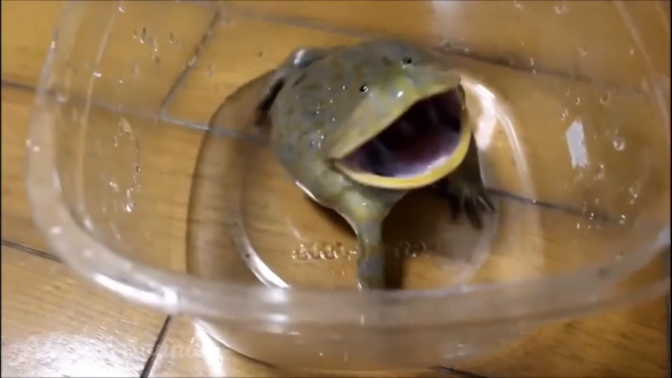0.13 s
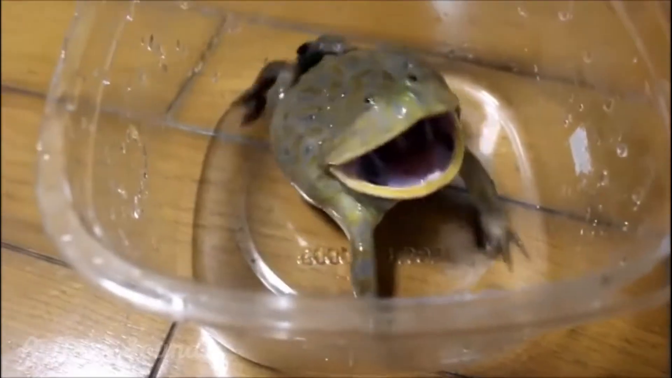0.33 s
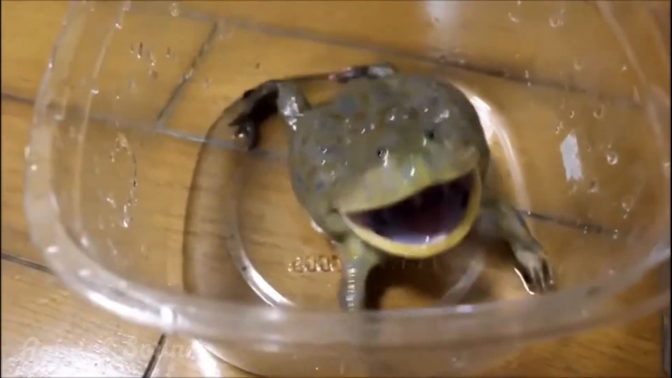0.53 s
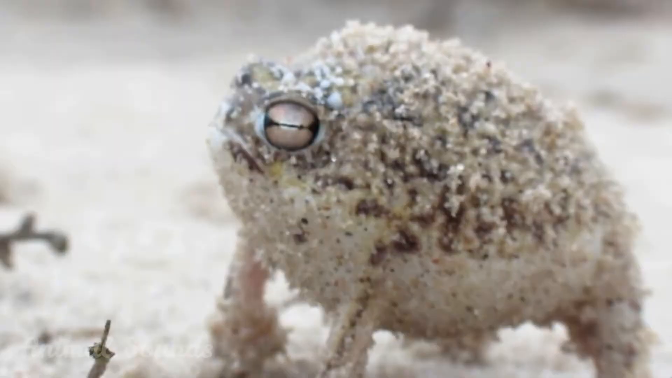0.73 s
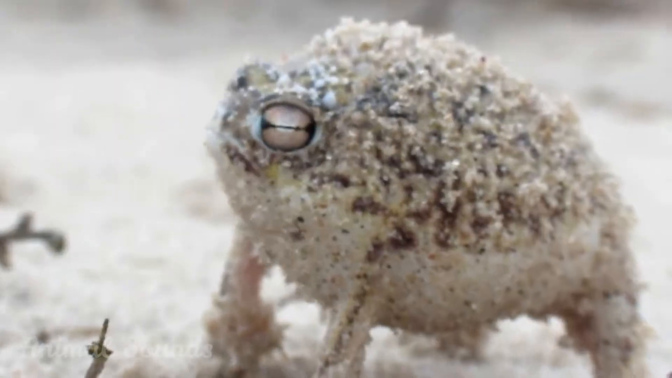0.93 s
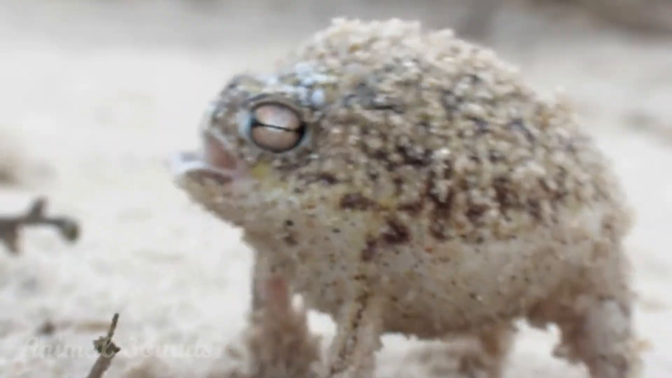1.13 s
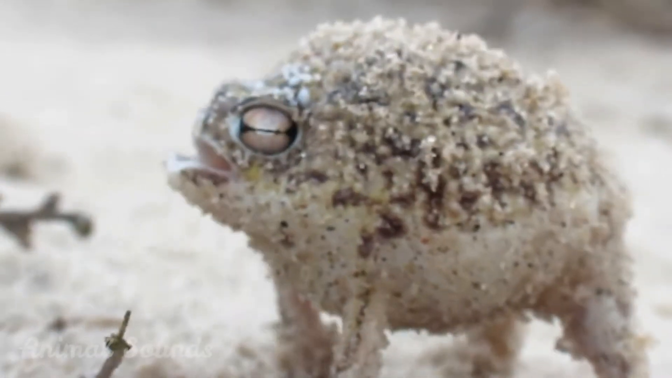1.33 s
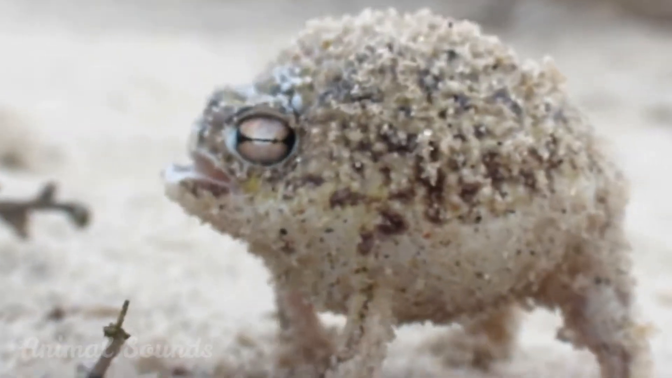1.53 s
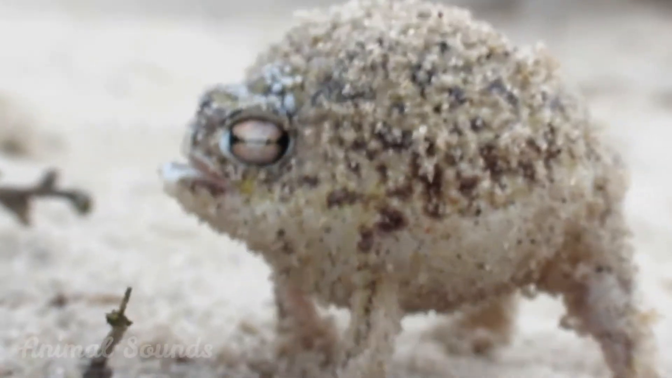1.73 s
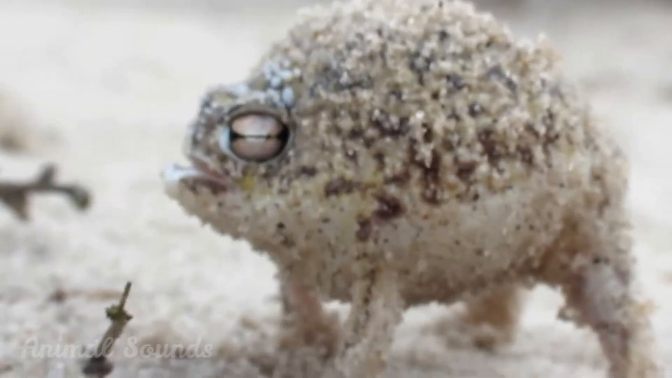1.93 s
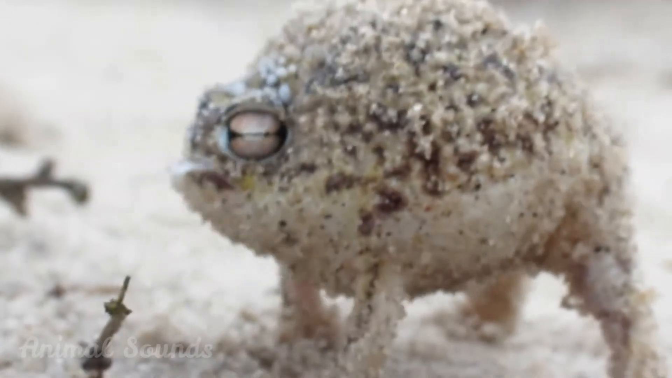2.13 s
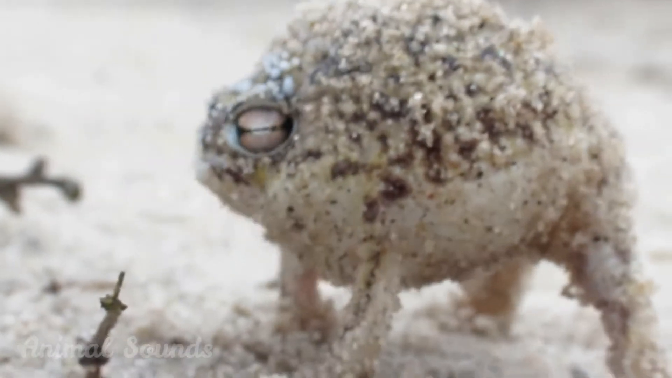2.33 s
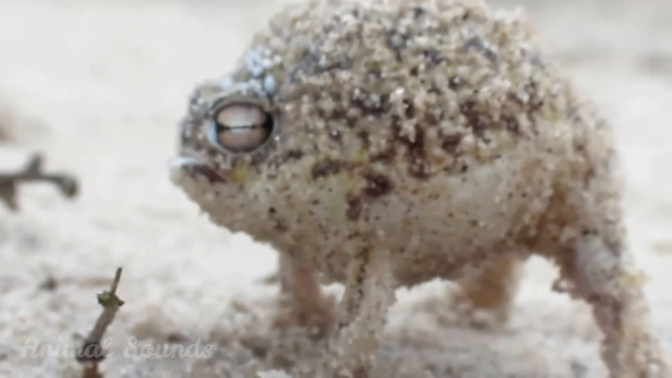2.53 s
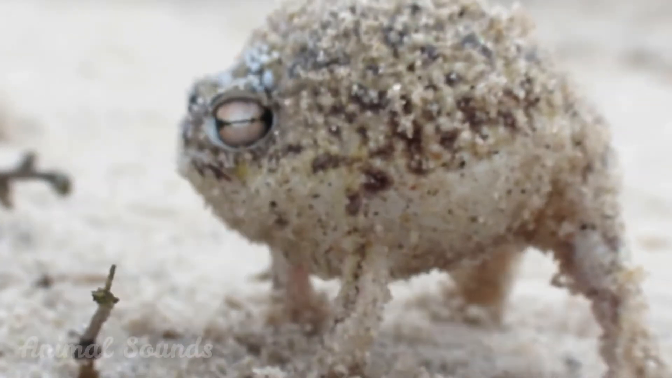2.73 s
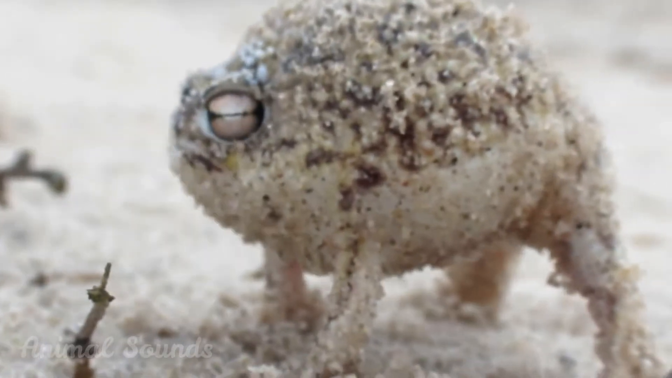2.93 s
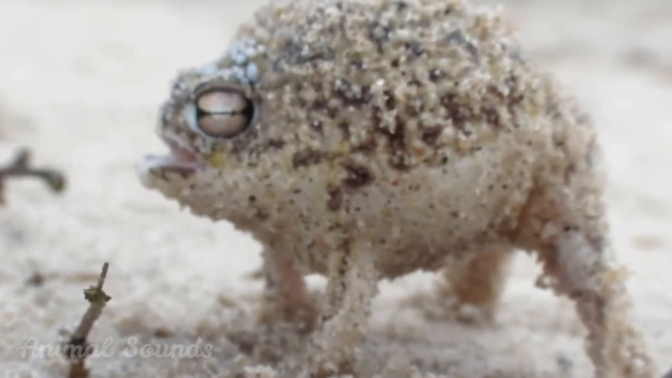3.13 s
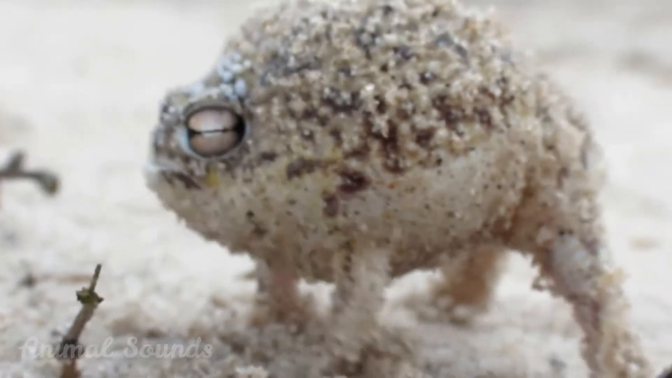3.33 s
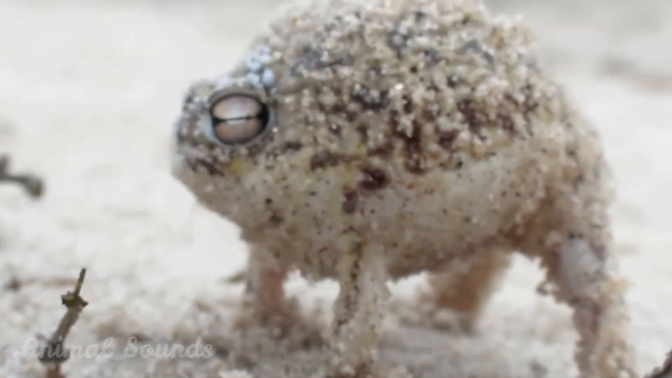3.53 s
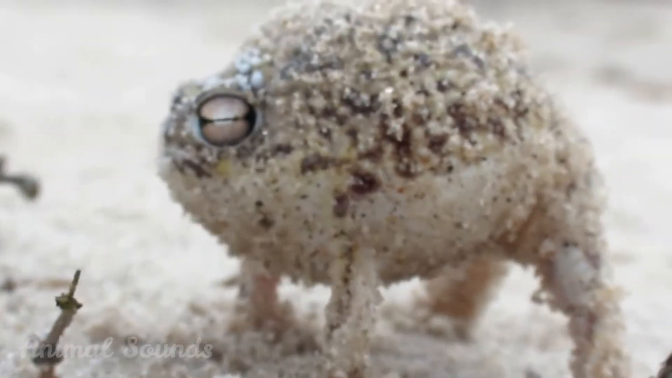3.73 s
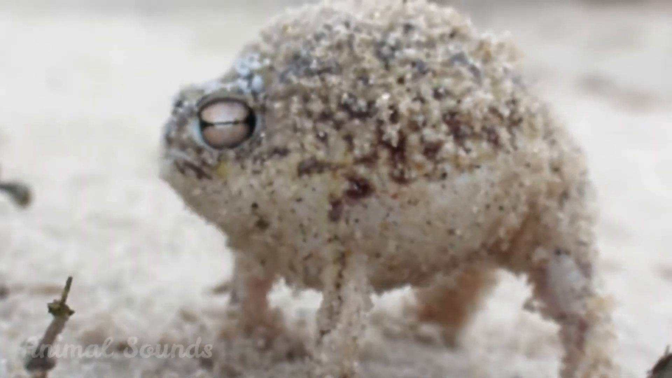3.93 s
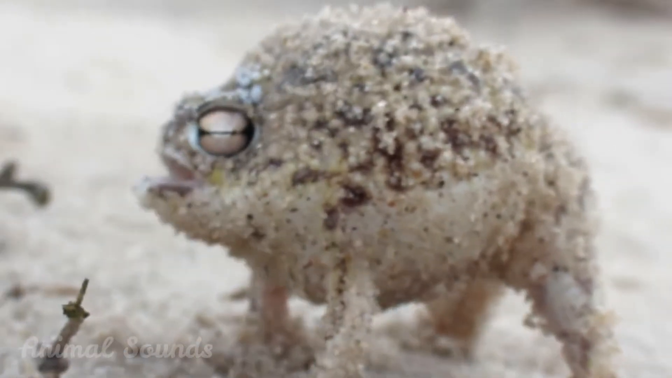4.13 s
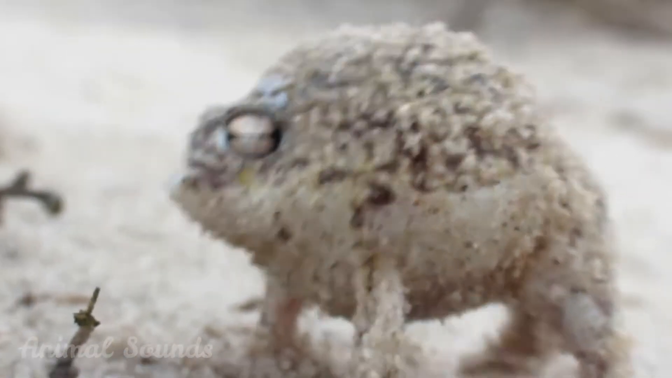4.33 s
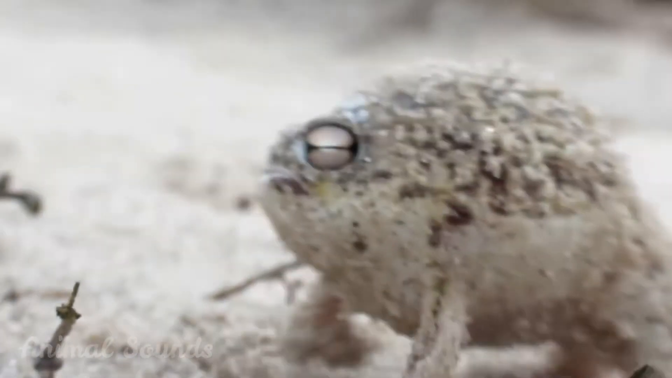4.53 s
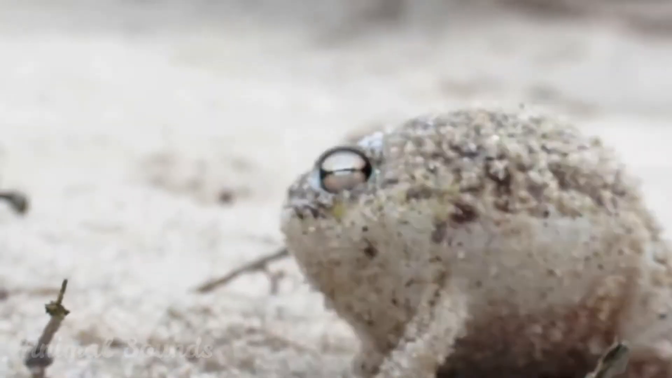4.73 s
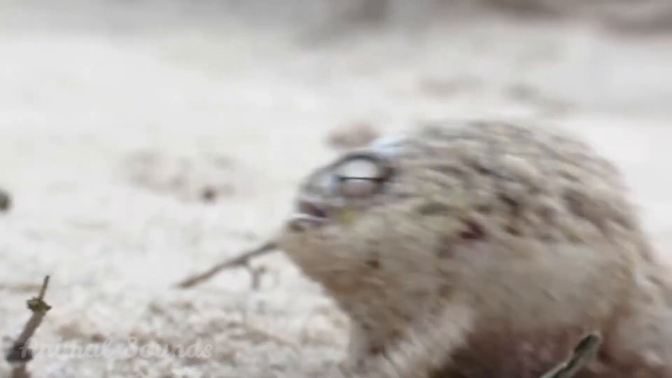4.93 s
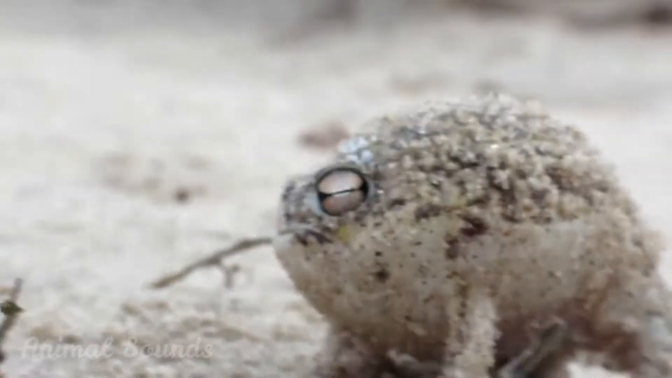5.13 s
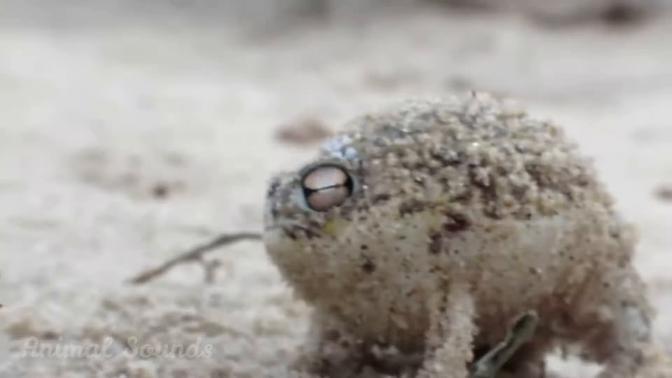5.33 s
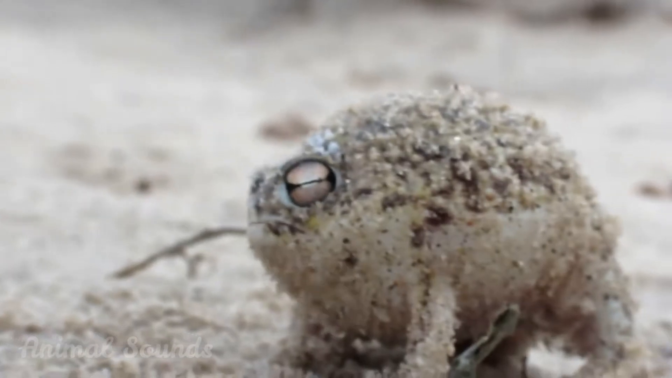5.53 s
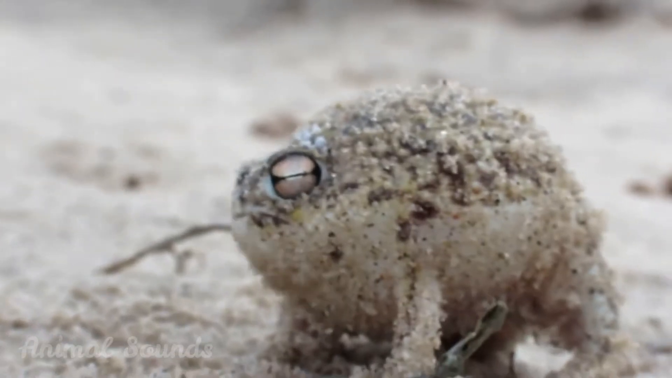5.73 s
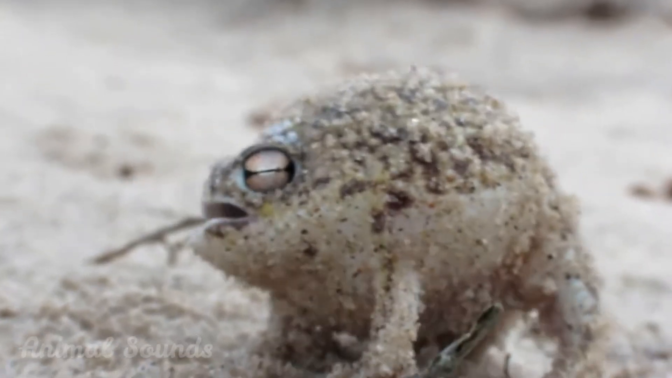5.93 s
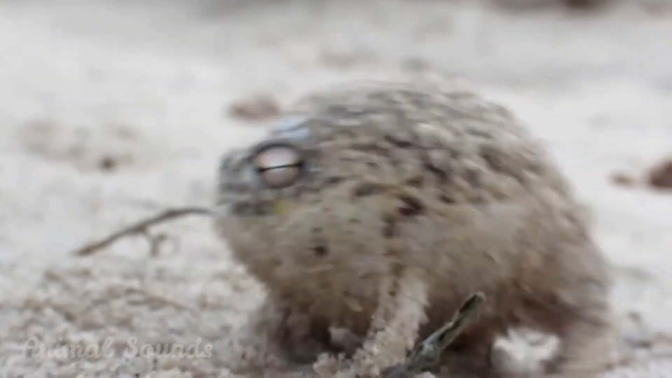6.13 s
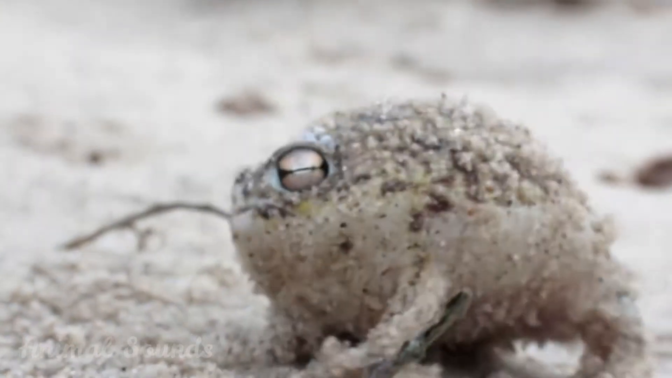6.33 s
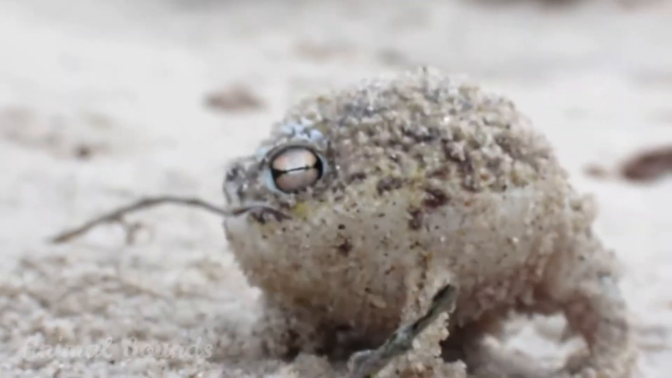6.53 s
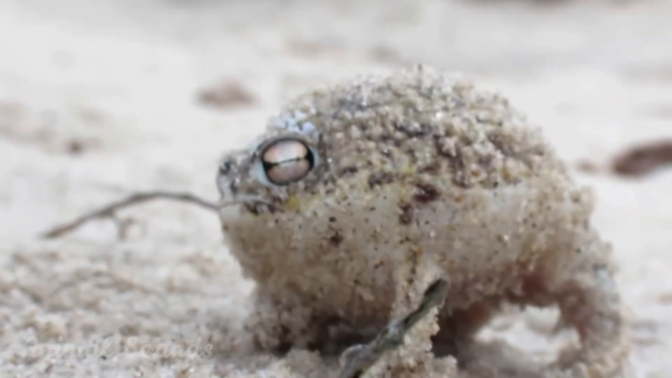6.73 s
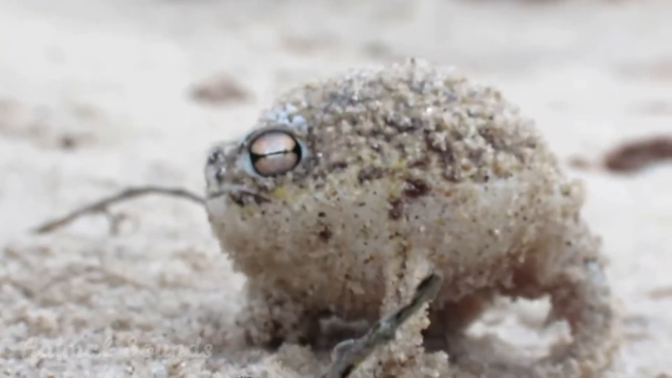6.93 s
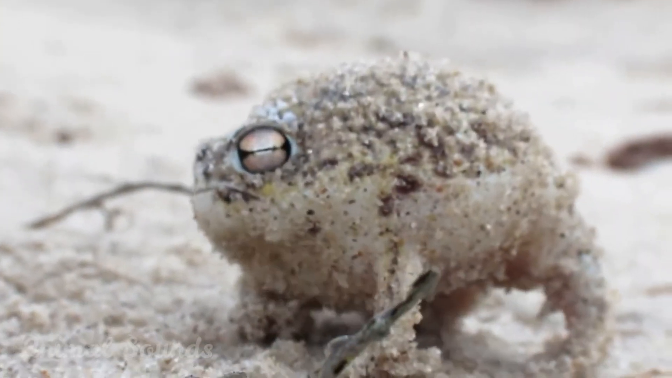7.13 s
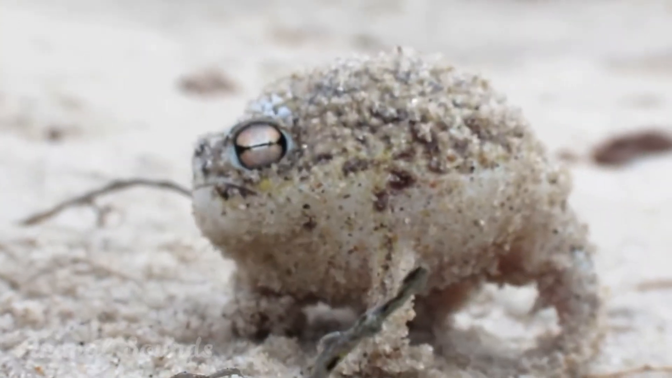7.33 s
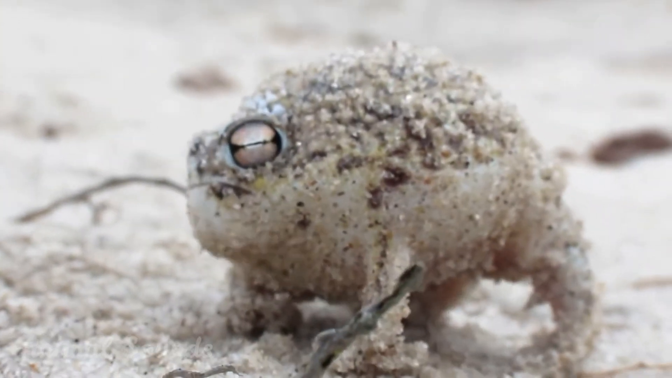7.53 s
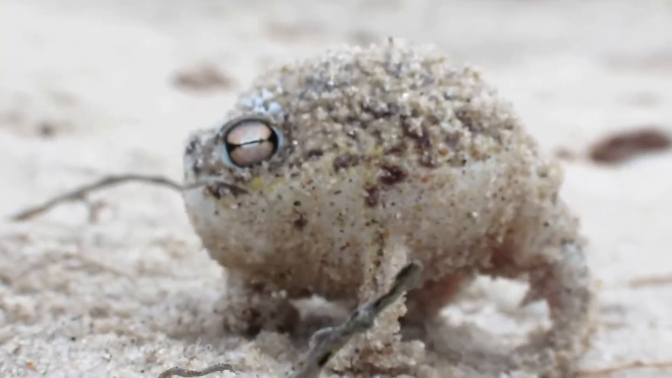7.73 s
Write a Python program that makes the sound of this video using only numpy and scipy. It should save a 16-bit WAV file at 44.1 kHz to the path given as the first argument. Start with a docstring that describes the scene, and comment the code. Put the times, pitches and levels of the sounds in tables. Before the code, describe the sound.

A small frog squeals seven times up close, high and reedy like a squeaky toy, over a faint low rumble.

```python
"""A frog shuffles briefly in a plastic tub, then silence. A soft low rumble, a hum and a faint hiss come in.
Close by, a small round rain frog squeals seven times: each squeal is a reed-like pulse train that
arches in pitch, rings in the mouth near 7 kHz and sags into a creak. Just before the fourth, a dull
bump hits the microphone. The last squeal is short and half-hearted, and one tiny tick of sand follows."""
import sys
import numpy as np
from scipy import signal
from scipy.fft import rfft, irfft
from scipy.io import wavfile
from scipy.ndimage import uniform_filter1d

SR = 44100
rng = np.random.default_rng(int(sys.argv[2]) if len(sys.argv) > 2 else 0)


def output_pcm(signal):
    """Save a mono or channel-first signal as 16-bit PCM at the path in sys.argv[1].

    Samples are clipped to [-1, 1] before scaling.
    """
    pcm = np.clip(np.atleast_2d(signal).T, -1, 1) * 32767
    wavfile.write(sys.argv[1], SR, np.round(pcm).astype(np.int16))


N = 343980
TIME = np.arange(N) / SR
FREQS = np.fft.rfftfreq(N, 1 / SR) + 1

# The squeals. Each row: start, end and scratchy onset in seconds, pitch overshoot as a share, widest
# mouth opening from 0 to 1, then opening, narrowing, nearly shut tail, fade and creak times in seconds,
# throat trim in dB, hoarseness in dB.
SQUEALS = [(1.172, 2.301, 0.011, 0.078, 1, 0.029, 0.69, 0.094, 0.056, 0.041, -2, -34),
           (2.495, 2.766, 0.011, 0.2, 1, 0.015, 0.033, 0.15, 0.035, 0.034, 0.5, -22.5),
           (3.068, 3.466, 0.0073, 0.51, 0.89, 0.058, 0.071, 0.096, 0.067, 0.015, -1.5, -34),
           (4.091, 4.713, .011, 0.54, 0.97, 0.026, 0.3, 0.15, 0.062, 0.048, 0, -36.5),
           (4.925, 5.243, .016, .5, 1, 0.056, 0.21, 0.071, 0.028, 0.0557, 1.5, -25),
           (5.886, 6.239, .015, .38, 0.91, 0.04, .13, .079, 0.044, 0.087, 1, -23),
           (6.538, 6.647, 0.044, 0.026, 0.3, 0.21, .02, 0.072, 0.017, 0.033, -2.5, -2.5)]
# Pitch arch of the vocal folds, one list a squeal. Each point: time in seconds, pitch in Hz.
PITCH_ARCHES = [
    [(1.195, 1374), (1.223, 1455), (1.247, 1540), (1.265, 1640), (1.385, 1522), (1.511, 1295),
     (1.573, 1207), (1.711, 1170), (1.787, 1018), (1.859, 1050), (2.113, 1064), (2.173, 938), (2.191, 888),
     (2.215, 798), (2.241, 630), (2.27, 590)],
    [(2.512, 1172), (2.578, 1285), (2.6, 1273), (2.62, 1137), (2.724, 882), (2.735, 933)],
    [(3.084, 864), (3.13, 1030), (3.168, 1141), (3.308, 1104), (3.378, 971), (3.43, 804)],
    [(4.112, 1017), (4.16, 1215), (4.232, 1253), (4.328, 1101), (4.43, 927), (4.494, 902.4), (4.55, 817),
     (4.61, 818), (4.656, 667), (4.672, 674), (4.68, 672)],
    [(4.947, 870), (4.991, 1007), (5.063, 1047), (5.099, 951), (5.129, 838), (5.169, 614), (5.185, 613),
     (5.207, 552), (5.215, 508.8)],
    [(5.907, 1004), (5.951, 1149), (5.987, 1203), (6.073, 1058), (6.121, 867), (6.155, 672), (6.171, 763),
     (6.177, 698.0), (6.191, 541.5), (6.21, 474)],
    [(6.548, 789), (6.61, 795), (6.642, 602)],
]
# Swells of the ringing mouth, one list a squeal. Each point: time in seconds, relative level in dB.
RING_SWELLS = [
    [(1.176, -18), (1.182, -9.5), (1.216, -8.5), (1.282, -16), (1.362, -11), (1.4, -6), (1.448, -18.5),
     (1.488, -16), (1.51, -15.5), (1.554, -10.5), (1.738, -14), (1.78, -17.5), (1.982, -9.5), (2.076, -9.5),
     (2.134, -15), (2.196, -15), (2.23, -29), (2.3, -60)],
    [(2.497, -28.5), (2.501, -14), (2.545, -13.5), (2.577, -7.5), (2.615, -15.5), (2.623, -21),
     (2.699, -25), (2.765, -57)],
    [(3.07, -30.5), (3.092, -11), (3.108, -8), (3.14, -15.5), (3.17, -11), (3.308, -12.5), (3.37, -16.5),
     (3.38, -39), (3.468, -63)],
    [(4.096, -24.5), (4.118, -5.5), (4.142, -16.5), (4.164, -8.5), (4.24, -9.5), (4.32, -17.5),
     (4.352, -13.5), (4.424, -16), (4.478, -11), (4.514, -11.5), (4.656, -33.5), (4.71, -45)],
    [(4.925, -28), (4.945, -18), (4.983, -12.5), (5.023, -7), (5.103, -18.5), (5.123, -10.5),
     (5.139, -18.5), (5.159, -16.5), (5.217, -35.5), (5.25, -50)],
    [(5.889, -29), (5.911, -8), (5.933, -12.5), (5.953, -6.5), (5.999, -8), (6.053, -16.5), (6.075, -11.5),
     (6.139, -14.5), (6.213, -36), (6.24, -66.5)],
    [(6.54, -34.5), (6.546, -34.5), (6.606, -31), (6.632, -44), (6.643, -53)],
]
# The voice with the mouth closed, ajar, narrow and wide.
# Each row: relative throat level in dB, relative edge level in dB, mouth resonance in Hz.
MOUTH_SHAPES = [(-36, -60, 1760), (-33, -47, 3850), (-33, -38.5, 6200), (-35.5, -28, 7580)]
# Tone of the throat, the mouth and the buzzing edge. Each row: frequency in Hz, relative level in dB.
THROAT_EQ = [(500, -26.5), (750, -14), (1100, -6.5), (1450, 3.5), (2100, 4), (2650, -1), (3350, 6.5),
             (3900, -2.5), (4400, -32), (5200, -12), (6500, -25.5)]
MOUTH_EQ = [(1000, -19.5), (2000, -9), (3400, -10.5), (4400, -17.5), (5200, -3), (6300, -7.5), (7400, -8.5),
            (9000, -8.5), (11000, -16)]
EDGE_EQ = [(7000, -26), (9600, 0), (10500, 3.5), (11500, -3), (12500, 0.5), (14400, 5), (15700, -1.5)]
# Stereo phase of the voice. Each row: frequency in Hz, lead of the left side in radians.
LEFT_LEAD = [(2150, 0), (3010, 1.0), (4740, -.8), (6030, .6), (7240, -.2), (8790, -.1), (9820, 1.1),
             (12300, 0), (14800, .7)]
# Stereo balance of the voice. Each row: frequency in Hz, left minus right in dB.
LEFT_LEAN = [(1300, 0), (2400, -1.5), (3300, 6), (4400, 4.5), (5400, -4.5), (6400, 4), (7400, 0.5),
             (8500, -4.5), (15000, -1.5)]
# Low hum in the tub. Each row: frequency in Hz, peak level in dB.
TUB_TONES = [(100, -39.5), (228, -45.5)]
# Ticks of sand. Each row: start in seconds, level in dB.
SAND_TICKS = [(0.855, -42), (5.37, -53), (7.52, -59.5)]
# Swells of the microphone bump. Each row: centre in seconds, half-length in seconds, level in dB.
BUMP_SWELLS = [(3.888, 0.023, -33.5), (3.934, 0.014, -21.5), (3.963, 0.026, -31), (4.311, .06, -36),
               (4.599, 0.18, -33.5)]
# Colours of the four noises. Each row: frequency in Hz, relative level in dB.
SHUFFLE_EQ = [(30, -7), (105, 0), (160, -8), (235, -14), (400, -16), (660, -11.5), (1100, -14),
              (1700, -22.5), (3100, -21), (3900, -34), (11000, -48.5)]
BUMP_EQ = [(25, 3), (50, 6), (100, 5), (170, -2), (280, -7.5), (500, -27), (1200, -62.5)]
RUMBLE_EQ = [(25, -8.5), (60, 0), (100, -3), (160, -3), (280, -4), (450, -11), (800, -17), (1400, -27.5),
             (3000, -41)]
HISS_EQ = [(530, -42.5), (900, -8), (1340, -2), (1830, -3.5), (2390, -9.5), (5410, -11.5), (13700, -21),
           (16000, -33)]
# Stereo width of the rumble. Each row: frequency in Hz, side minus mid in dB.
RUMBLE_SPREAD = [(50, 3), (180, -9.5), (550, -2.5), (1650, 1.5)]

AJAR, NARROW = 1 / 3, 2 / 3   # mouth openings between 0, closed, and 1, wide
AIR_START_S, CUTOFF_HZ = .749, 15900


def squeal(row, arch, swells, flutter_db=1.66, flutter_hz=25, ring_trim_db=-2.5, weak_edge_db=28):
    """Harmonics of the vocal folds sweep through a mouth resonance that sinks as the mouth closes."""
    start, end, catch_s, overshoot, widest, open_s, narrowing_s, tail_s = row[:8]
    fade_s, creak_s, throat_trim_db, hoarse_db = row[8:]
    size = int(np.ceil((end - start) * 10)) * SR // 10
    at = int(start * SR) + np.arange(size)
    t = at / SR
    # the folds catch high and unevenly at the start, follow a rounded arch and creak when they go slack
    catch = np.exp(-((t - start) / catch_s) ** 2)
    slack = np.clip((t - end + creak_s) / 0.001, 0, 1)
    pitch = uniform_filter1d(in_time(arch, t)[0], size=SR // 45, mode="nearest") * (1 + overshoot * catch)
    jitter = (.0017 + .015 * catch + .035 * slack) * waver(320, size)
    wobble = .0024 * waver(flutter_hz, size)
    phase = 2 * np.pi * np.cumsum(pitch * (1 + jitter + wobble)) / SR
    harmonic = np.arange(1, 29)[:, None]
    hz = harmonic * pitch
    audible = np.clip((CUTOFF_HZ - hz) / 200 + 1, 0, 1)
    # three registers: throat, ringing mouth and a buzzing edge that a half-hearted squeal loses
    opening = mouth_opening(t, start, end, widest, open_s, narrowing_s, tail_s)
    resonance = mouth_resonance(hz, pitch, opening)
    throat_db, edge_db, _ = mouth_shape(opening)
    edge_db -= weak_edge_db * (1 - widest)
    ring_db = in_time(swells, t)[0] + ring_trim_db
    fade_db = -18 * np.clip(1 - (end - t) / fade_s, 0, 1)
    flutter = from_db(flutter_db * np.array([waver(flutter_hz, size) for _ in harmonic]))
    throat = register(THROAT_EQ, hz, audible, throat_db + throat_trim_db + fade_db)
    ring = register(MOUTH_EQ, hz, np.abs(resonance) * flutter * audible, ring_db)
    edge = register(EDGE_EQ, hz, flutter * audible, edge_db + fade_db)
    grit = rasp(harmonic, hz, t - start, hoarse_db, uneven=.5 * slack + catch)
    height = np.sqrt(throat ** 2 + ring ** 2 + edge ** 2) * np.abs(grit)
    angle = harmonic * phase + np.angle(resonance * grit)
    creak_db = slack * (-3 - waver(189, size))   # the level drops and shakes in the creak
    out = np.zeros((2, N))
    out[:, at] = spread_voice(hz, height, angle) * gate(t, start, end, 0.0017) * from_db(creak_db)
    return out


def mouth_opening(t, start, end, widest, open_s, narrowing_s, tail_s, snap_s=0.013):
    """The mouth flies open, holds, narrows, snaps to ajar and closes over the tail."""
    shut = end - max(tail_s, snap_s)
    rise = np.interp(t, [start, start + open_s], [AJAR, 1])
    fall = np.interp(t, [shut - narrowing_s, shut, shut + snap_s, end], [1, NARROW, AJAR, 0])
    return np.minimum(np.minimum(rise, fall), widest)


def mouth_shape(opening):
    """Throat level, edge level and resonance at a given opening of the mouth."""
    return [np.interp(opening, np.linspace(0, 1, len(c)), c) for c in np.transpose(MOUTH_SHAPES)]


def mouth_resonance(hz, pitch, opening, width_hz=500, slack_hz=926):
    """The open mouth's high ring hands over to a low one as it shuts; both sag with slack folds."""
    sag = np.minimum(pitch / slack_hz, 1) ** 0.73
    high_hz = sag * mouth_shape(np.maximum(opening, NARROW))[-1]
    low_hz = sag * mouth_shape(np.minimum(opening, AJAR))[-1]
    high, low = [1 / (1 + 2j * (hz - centre) / width_hz) for centre in (high_hz, low_hz)]
    share = np.clip((opening - AJAR) / (NARROW - AJAR), 0, 1)
    return share * high + (1 - share) * low


def register(eq, hz, weights, level_db):
    """One layer of the voice: its level is shared among the harmonics by tone and weight."""
    gains = from_db(at_hz(eq, hz)) * weights
    return gains * from_db(level_db) * np.sqrt(2 / np.sum(gains ** 2, axis=0))


def rasp(harmonic, hz, age, hoarse_db, uneven, strain_db=7.5, strain_s=.09, scratch_db=-3.5, rate_hz=450):
    """Turbulence frays the upper harmonics, most at the onset; uneven folds fray nearly all of them."""
    strained_db = hoarse_db + strain_db * np.exp(-age / strain_s)
    turbulence = from_db(strained_db) * (hz / 7000) ** 2 * np.clip(hz / 5000, 0, 1) ** 2
    fray = turbulence + from_db(scratch_db) * uneven * np.clip(harmonic / 3, 0, 1)
    chance = np.array([waver(rate_hz, len(age)) + 1j * waver(rate_hz, len(age)) for _ in harmonic])
    return (1 + fray * chance) / np.sqrt(1 + 2 * fray ** 2)


def spread_voice(hz, height, angle):
    """Sum the harmonics; each reaches left and right with its own phase and level."""
    lead = at_hz(LEFT_LEAD, hz) / 2
    lean = from_db(at_hz(LEFT_LEAN, hz) / 2)
    return np.array([np.sum(height * lean ** side * np.cos(angle + side * lead), 0) for side in (1, -1)])


def room(x, early_t60=.06, tail_t60=.2, early_db=-14, tail_db=-24, low_cut_hz=4700):
    """Dense, quickly dying reflections from close surfaces, and a faint tail; mostly treble."""
    t = TIME[:SR // 2]
    early, tail = rng.standard_normal((2, 2, len(t))) * (t > .002)
    early = from_db(early_db) * rms_one(early * from_db(-60 * t / early_t60))
    tail = from_db(tail_db) * rms_one(tail * from_db(-60 * t / tail_t60))
    bright = signal.sosfilt(signal.butter(4, low_cut_hz, "high", fs=SR, output="sos"), x)
    return signal.fftconvolve(bright, (early + tail) / np.sqrt(len(t)), axes=1)[:, :N]


def tub(end_s=.106, shuffle_db=-39, knock_s=0.0575, knock_hz=950, knock_db=-31):
    """A moment of shuffling in a plastic tub over a low hum, with one soft hollow knock."""
    shuffle = from_db(shuffle_db) * noise(SHUFFLE_EQ, side_db=-17)
    knock_level = from_db(knock_db) * np.exp(-((TIME - knock_s) / 0.003) ** 2)
    knock = knock_level * np.sin(2 * np.pi * knock_hz * TIME)
    drone = sum(from_db(db) * np.sin(2 * np.pi * hz * TIME) for hz, db in TUB_TONES)
    return (shuffle + knock + drone) * gate(TIME, 0, end_s, 0.00091)


def sand(decay_s=0.0036):
    """Grains shift with tiny bright ticks."""
    level = sum(from_db(db) * (TIME > s) * np.exp(-np.clip((TIME - s) / decay_s, 0, 20))
                for s, db in SAND_TICKS)
    return level * noise([(500, -20), (2500, 1), (6000, 0), (14000, -8)], side_db=-3)


def microphone_bump():
    """A dull, wide thud: a shaken microphone moves its two capsules mostly against each other."""
    level = sum(from_db(db) * np.exp(-((TIME - s) / half_s) ** 2) for s, half_s, db in BUMP_SWELLS)
    return level * noise(BUMP_EQ, side_db=7)


def air(rumble_db=-46.5, hiss_db=-62.5, extra_hiss_db=16, settle_s=.55):
    """A steady low rumble, and a thin hiss that starts louder and settles."""
    rumble = from_db(rumble_db) * noise(RUMBLE_EQ, at_hz(RUMBLE_SPREAD, FREQS))
    lift_db = extra_hiss_db * np.exp(-np.maximum(TIME - AIR_START_S, 0) / settle_s)
    return rumble + from_db(hiss_db + lift_db) * noise(HISS_EQ, side_db=-3.5)


def hum(hz=99, level_db=-53.5, fade_start_s=2.64, fade_db_per_s=11):
    """A low, wavering hum that fades away."""
    level = from_db(level_db - fade_db_per_s * np.maximum(TIME - fade_start_s, 0))
    return level * np.sqrt(2) * np.sin(2 * np.pi * hz * TIME + .5 * waver(6, N))


def noise(eq, side_db):
    """Coloured stereo noise of a given width (one value, or one for each frequency); rms 1."""
    top_rolloff = np.hypot(1, (FREQS / eq[-1][0]) ** 2)
    low_cut = FREQS / np.hypot(FREQS, 20)
    colour = from_db(at_hz(eq, FREQS)) / top_rolloff * low_cut
    mid, side = rfft(rng.standard_normal((2, N))) * colour
    return rms_one(irfft(mid + from_db(side_db) * side * [[1], [-1]], N))


def waver(rate_hz, size):
    """Random motion up to a given rate; rms 1."""
    sos = signal.butter(2, rate_hz, fs=SR, output="sos")
    return rms_one(signal.sosfilt(sos, rng.standard_normal(size + SR // 10))[-size:])


def gate(t, start, end, edge_s):
    """Open from start to end, with short ramps."""
    return np.clip((t - start) / edge_s, 0, 1) * np.clip((end - t) / edge_s, 0, 1)


def in_time(rows, t):
    """Each column of a curve table at times t."""
    s, *columns = np.transpose(rows)
    return [np.interp(t, s, c) for c in columns]


def at_hz(points, hz):
    """Read a curve on a log-frequency axis."""
    f, value = np.transpose(points)
    return np.interp(np.log(hz), np.log(f), value)


def from_db(db):
    """Decibels to gain."""
    return 10 ** (np.asarray(db) / 20)


def rms_one(x):
    """Scale to unit power."""
    return x / np.sqrt(np.mean(x ** 2) + 1e-20)


def scene(duck_knee_db=-12):
    """The frog up front, with its surroundings and the tub; the bed ducks under the loudest squeals."""
    frog = sum(squeal(*parts) for parts in zip(SQUEALS, PITCH_ARCHES, RING_SWELLS))
    foreground = frog + room(frog) + sand()
    bed = (air() + hum() + microphone_bump()) * (TIME > AIR_START_S)
    frog_power = uniform_filter1d(np.mean(frog ** 2, axis=0), SR // 10)
    duck = 1 / np.sqrt(1 + np.abs(frog_power) / from_db(duck_knee_db) ** 2)
    return foreground + duck * bed + tub()


def record(dry):
    """A steep low-pass takes off the very top."""
    return signal.sosfilt(signal.ellip(12, .1, 90, CUTOFF_HZ, fs=SR, output="sos"), dry)


dry = scene()
out = record(dry)
output_pcm(out)
```